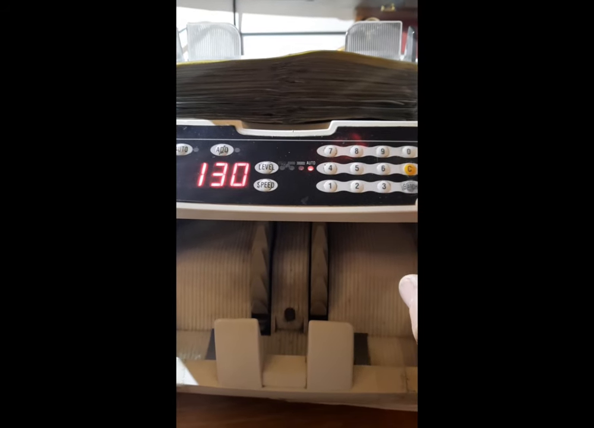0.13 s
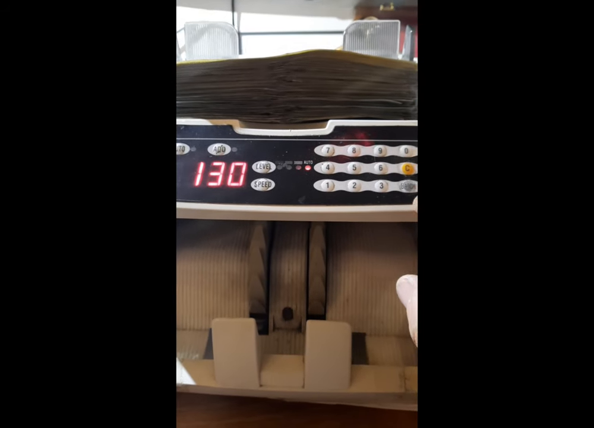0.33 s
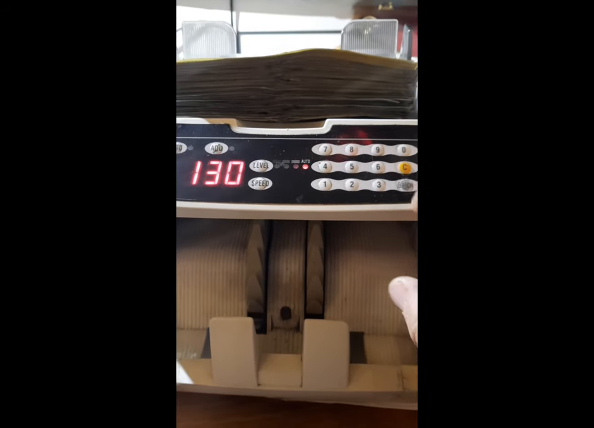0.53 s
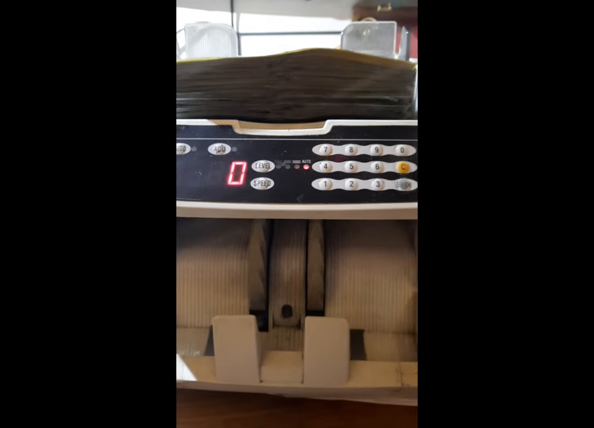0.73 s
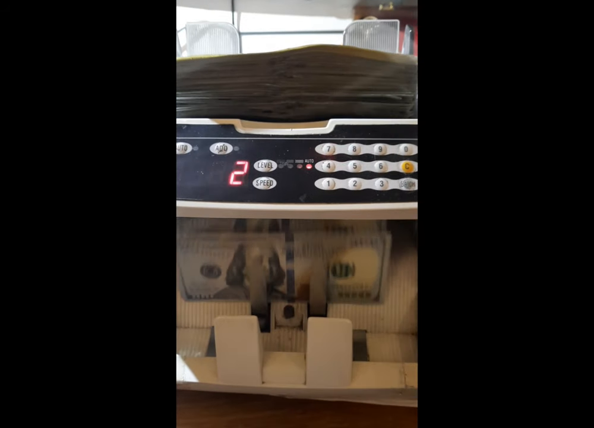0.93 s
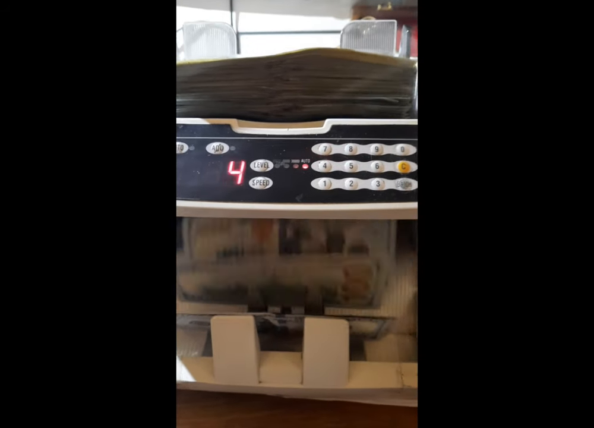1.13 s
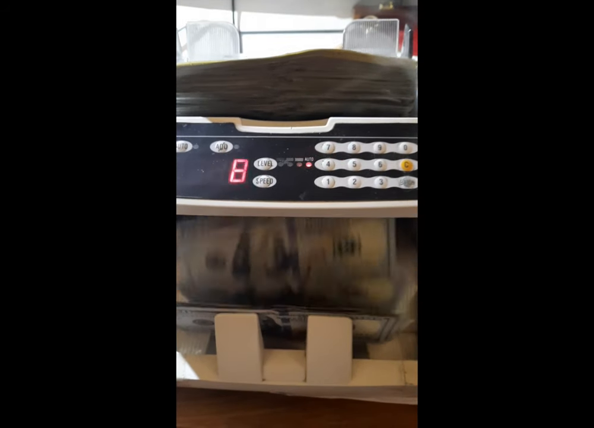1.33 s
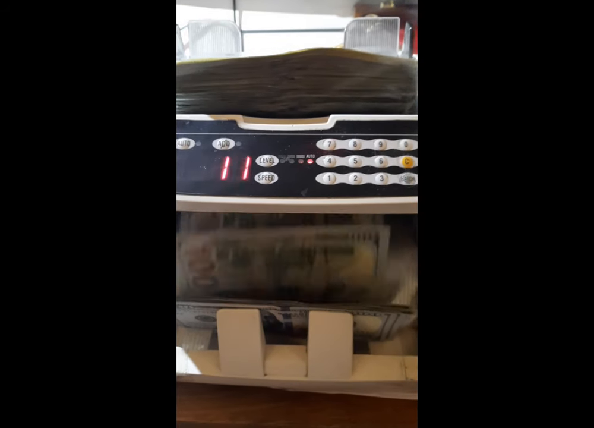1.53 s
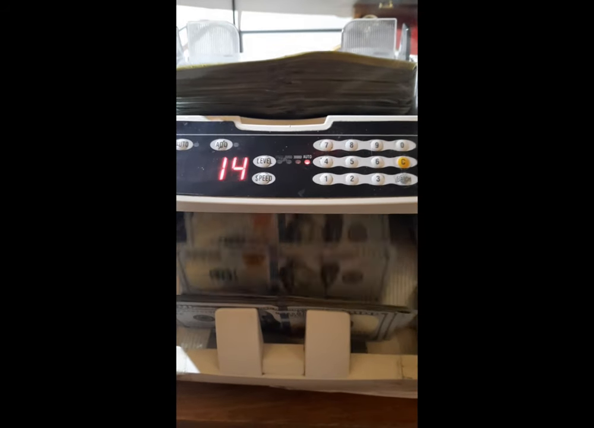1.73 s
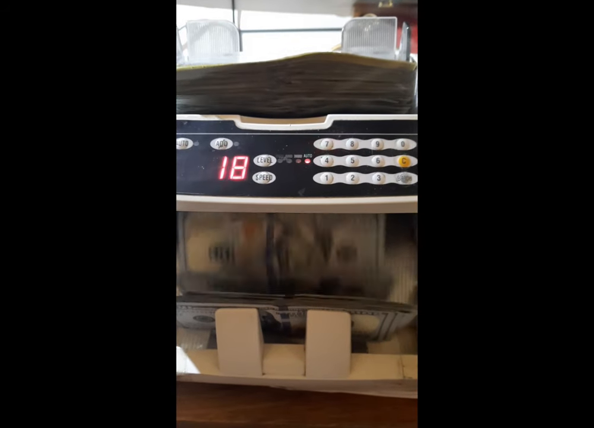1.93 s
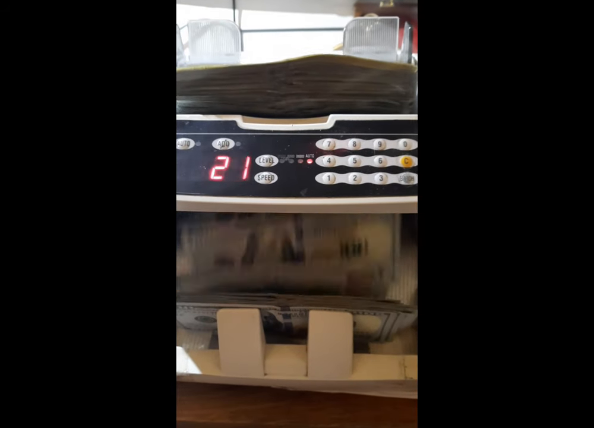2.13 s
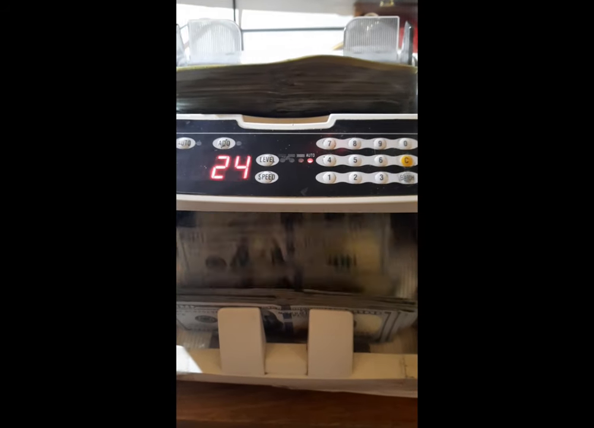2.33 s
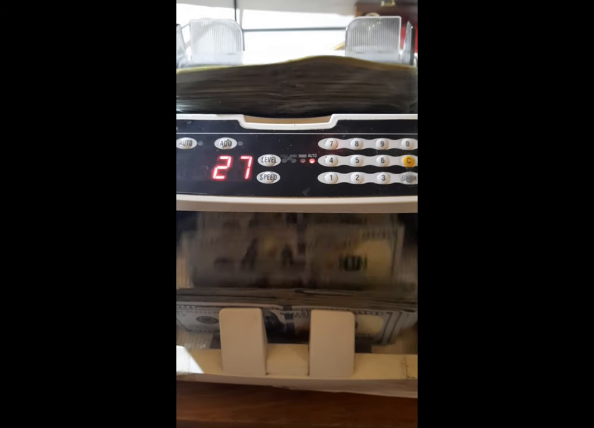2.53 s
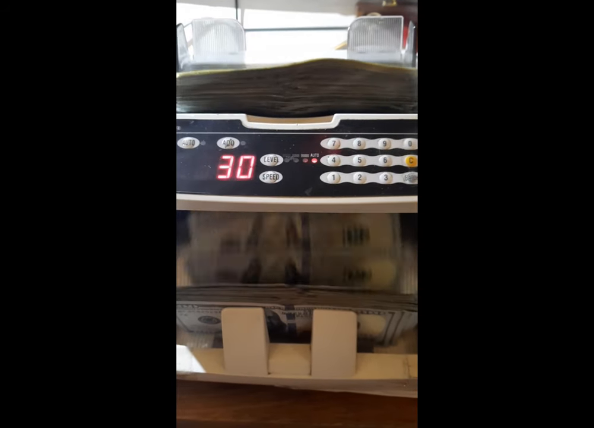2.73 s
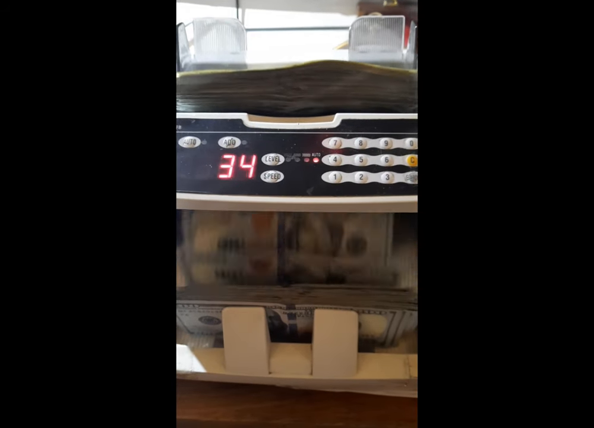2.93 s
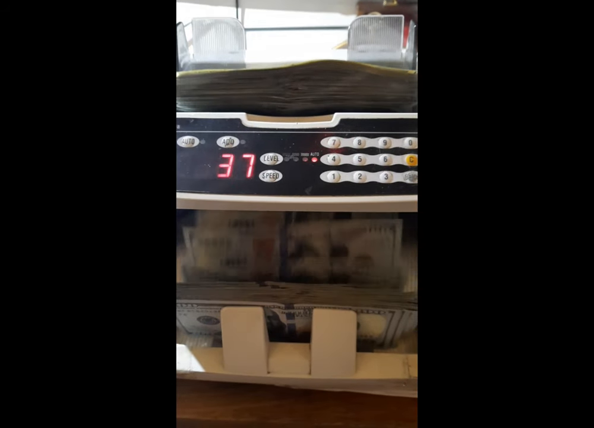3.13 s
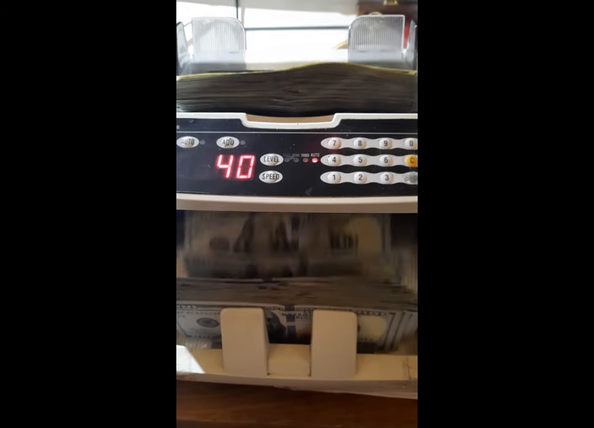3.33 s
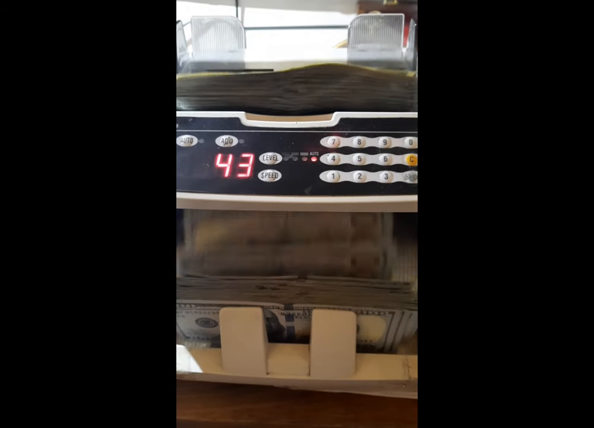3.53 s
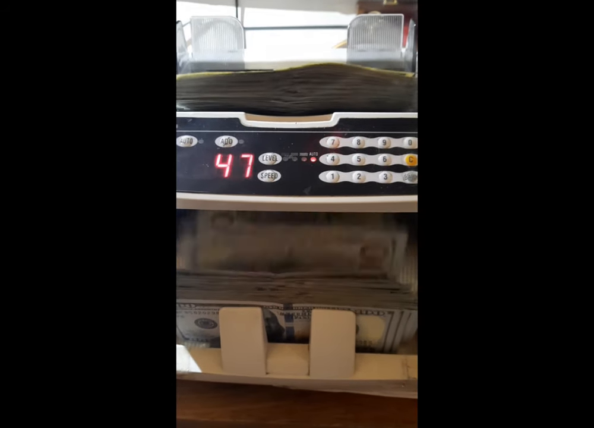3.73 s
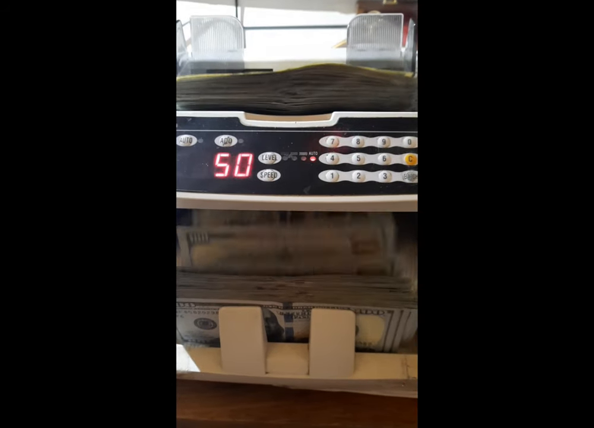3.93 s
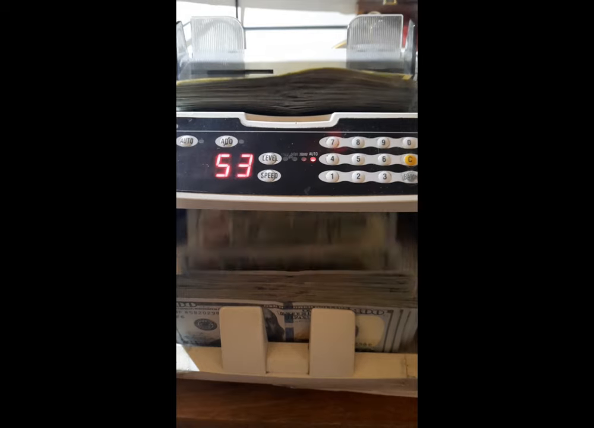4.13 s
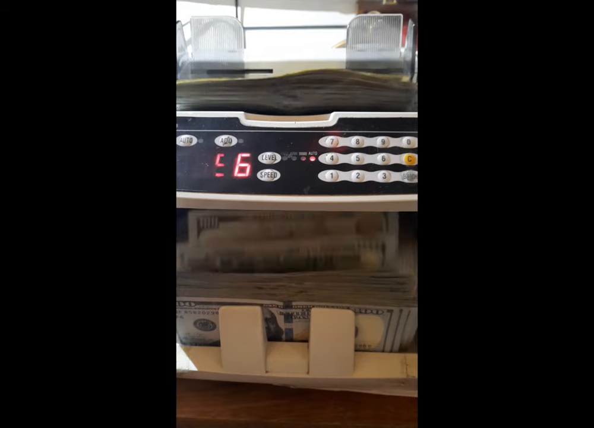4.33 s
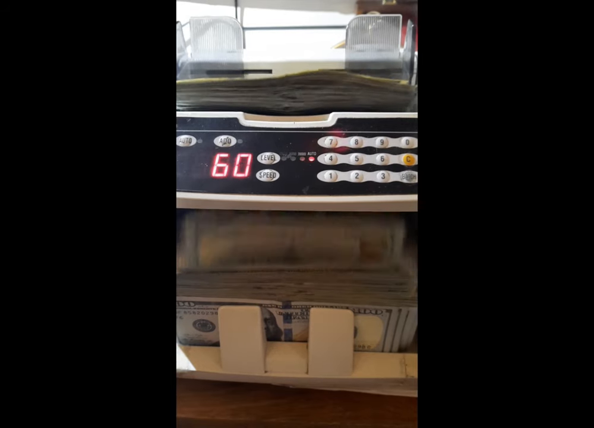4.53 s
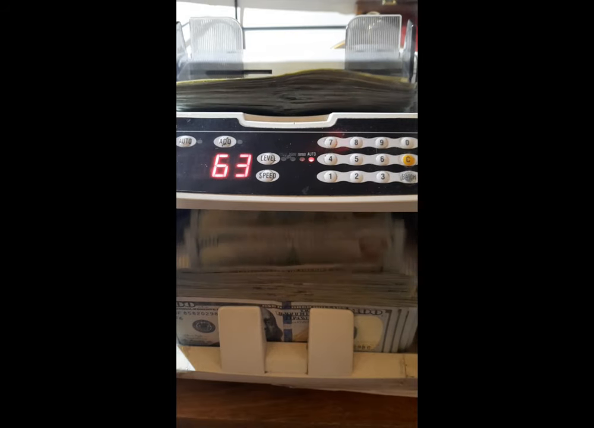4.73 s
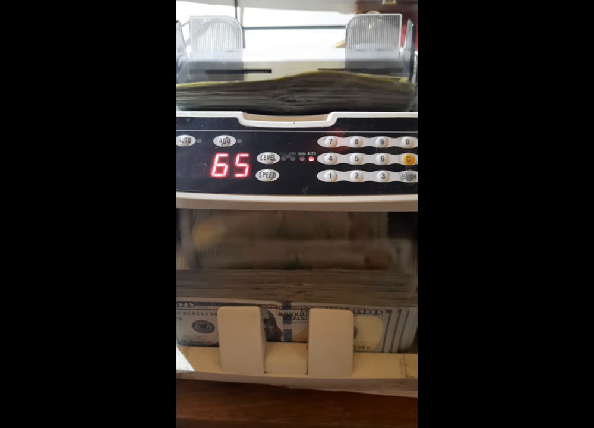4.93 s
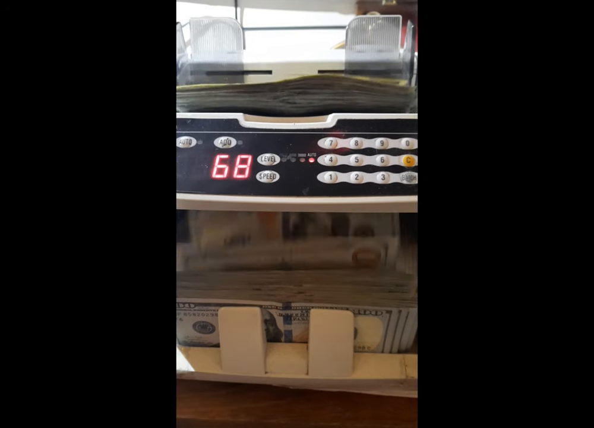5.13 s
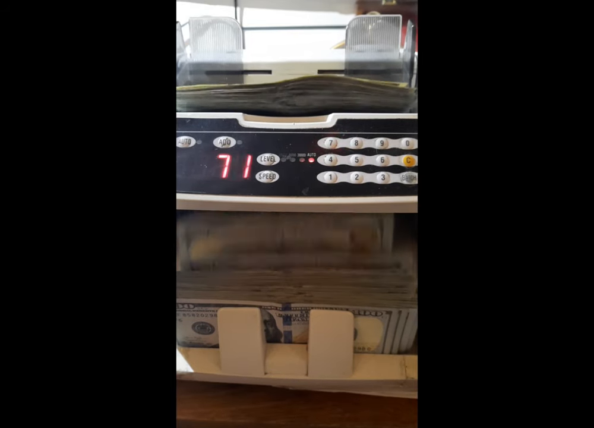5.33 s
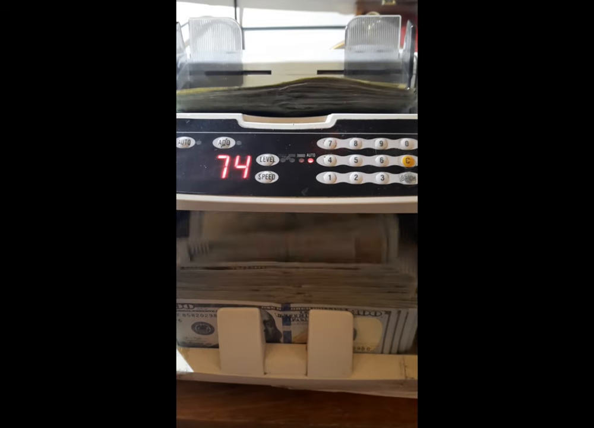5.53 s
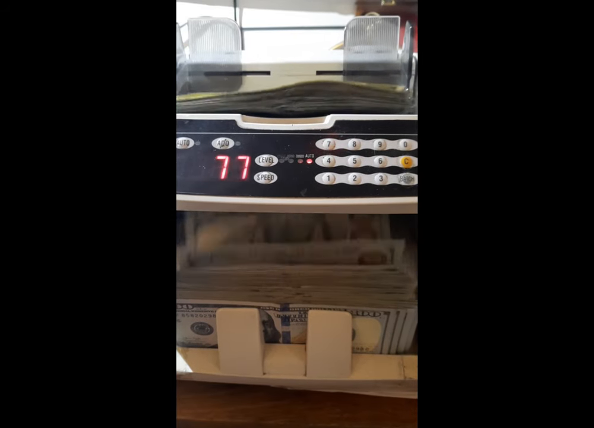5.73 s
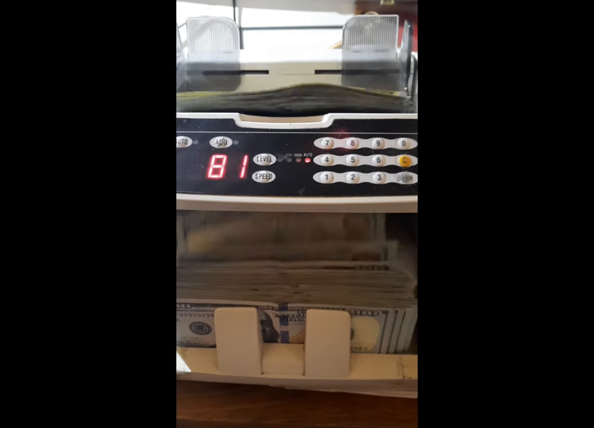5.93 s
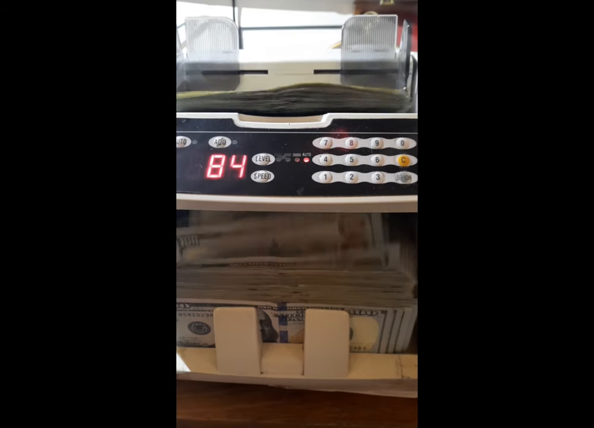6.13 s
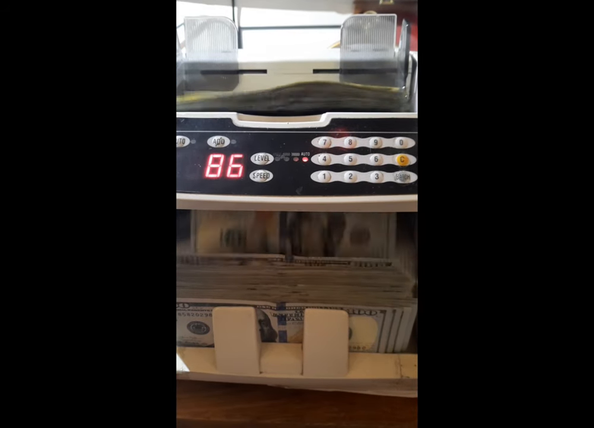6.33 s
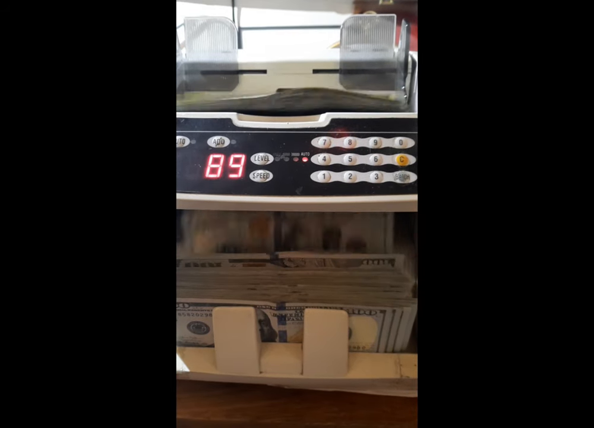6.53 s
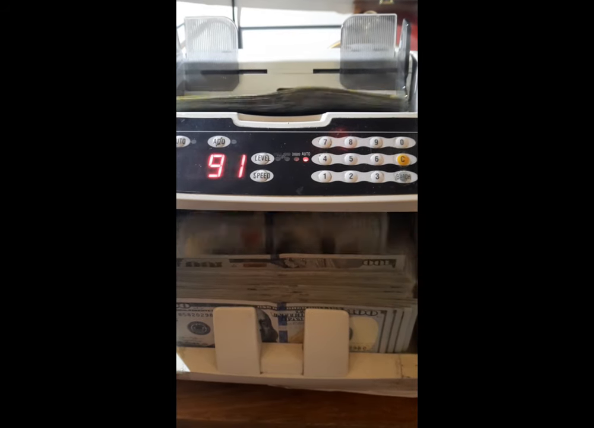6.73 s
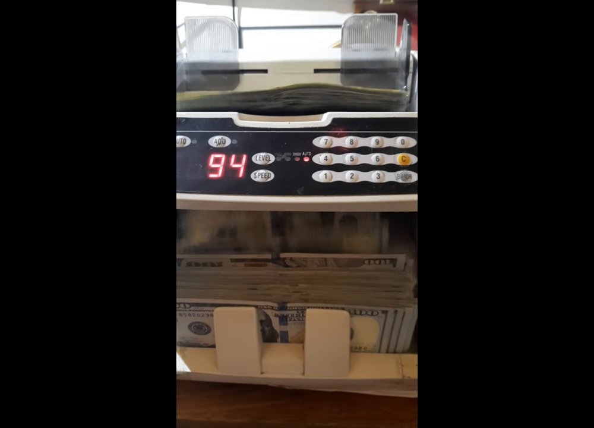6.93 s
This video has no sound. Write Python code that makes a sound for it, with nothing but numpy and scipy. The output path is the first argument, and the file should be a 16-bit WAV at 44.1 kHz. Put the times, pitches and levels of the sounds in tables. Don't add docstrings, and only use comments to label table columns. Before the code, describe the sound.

Close-up of a money counting machine: brief quiet, small clicks, a quick spin-up, then continuous fast papery flutter over a rattling, humming motor.

```python
import sys
import numpy as np
from scipy import signal
from scipy.fft import rfft, irfft, next_fast_len
from scipy.io import wavfile
from scipy.ndimage import uniform_filter1d

SR = 44100
rng = np.random.default_rng(int(sys.argv[2]) if len(sys.argv) > 2 else 0)


def wrap_up_sound(samples):
    columns = np.atleast_2d(samples).T
    tamed = np.clip(columns, -1, 1)
    steps = np.round(tamed * 32767).astype(np.int16)
    wavfile.write(sys.argv[1], SR, steps)


def gain_from_db(level_db):
    decades = np.asarray(level_db, float) / 20
    return 10 ** decades


N = 307818
FIRST_NOTE_S = .875

# frequency in Hz, density in dB per Hz.
PAPER_COLOUR = [(1300, -12), (2200, -1), (2750, -1), (3240, -7.5), (4700, -.6), (5410, -3.5), (6170, -2.5),
                (8170, -4.5), (8650, -5.5), (9550, -14), (11900, -3.5), (14000, -6), (16200, -7)]
# start in seconds, end in seconds.
DROPOUTS = [(2.9575, 3.0286), (4.0728, 4.1667)]
# centre in seconds, depth in dB, half length in seconds.
EMPTY_PATH = [(1.03, -4, 0.028), (5.02, -9, 0.034), (5.575, -10, 0.03), (6.487, -9, 0.028),
              (6.845, -7, 0.028), (6.965, -7, .015)]


def bins():
    return np.arange(next_fast_len(N) // 2 + 1) * SR / next_fast_len(N)


def on_log(table, hz):
    f, v = np.transpose(table)
    return np.interp(np.log(hz + 1), np.log(f + 1), v)


def shape(x, table):
    size = next_fast_len(N)
    y = irfft(rfft(x, size) * gain_from_db(on_log(table, bins())), size)[..., :N]
    return y / np.sqrt(np.mean(y ** 2))


def noise():
    # frequency in Hz, left-right likeness from 0 to 1.
    likeness = [(60, .92), (130, .96), (330, .95), (550, .85), (900, .65), (1250, .3), (1900, .55),
                (3000, .25), (9000, .2)]
    # frequency in Hz, left minus right in dB.
    tilt = [(60, 3), (110, 0.5), (200, -0.5), (380, 0), (700, 7.5), (1290, -3), (2380, -2.5), (4400, -4),
            (8120, -3), (15000, 1)]
    # frequency in Hz, lead of the left port in radians.
    lead = [(300, 0), (600, .6), (950, -1.3), (1380, 1.5), (1890, -.3), (3010, 3.1), (4480, 13.4),
            (16000, 27)]
    size = next_fast_len(N)
    like = on_log(likeness, bins())
    mid, side = rfft(rng.standard_normal((2, size)))
    opposite = np.array([[1], [-1]])
    pair = (np.sqrt(1 + like) * mid + np.sqrt(1 - like) * side * opposite) / np.sqrt(2)
    port = gain_from_db(on_log(tilt, bins()) / 2) * np.exp(.5j * on_log(lead, bins()))
    return irfft(pair * [port, 1 / port], size)[:, :N]


def ring(x, modes):
    y = 0
    for k, (hz, width, db) in enumerate(modes):
        b, a = signal.iirpeak(hz, hz / width, SR)
        y = y + (-1) ** k * gain_from_db(db) * signal.lfilter(b, a, x)
    return y / np.sqrt(sum(gain_from_db(2 * db) * width * np.pi / SR for hz, width, db in modes))


def even(x, modes, over_s):
    y = ring(ring(x, modes), modes)
    return y / np.sqrt(uniform_filter1d(np.mean(y ** 2, axis=0), int(over_s * SR)) + 1e-12)


def bursts(s, db, rise, fall):
    spikes = np.zeros(N)
    np.add.at(spikes, np.clip((np.asarray(s) * SR).astype(int), 0, N - 1), gain_from_db(db))
    after = signal.lfilter([1], [1, -np.exp(-1 / (abs(fall) * SR))], spikes)
    before = signal.lfilter([1], [1, -np.exp(-1 / (abs(rise) * SR))], spikes[::-1])[::-1]
    return after + before - spikes


def walk(rate):
    k = int(SR / rate)
    held = np.repeat(rng.standard_normal(N // k + 1), k)
    return 1.11 * uniform_filter1d(held, k)[:N]


def grain(rate, spread_db, smear_s):
    hits = (rng.random(N) < rate / SR) * gain_from_db(spread_db * rng.exponential(size=N))
    env = signal.lfilter([1], [1, -np.exp(-1 / (smear_s * SR))], hits)
    return env / np.sqrt(np.mean(env ** 2))


def bump(s, half_s):
    marks = np.zeros(N)
    marks[np.clip((s * SR).astype(int), 0, N - 1)] = 2 * half_s * SR
    return uniform_filter1d(uniform_filter1d(marks, int(2 * half_s * SR)), int(half_s * SR / 2))


def turns():
    # tick in seconds, turns made, seconds from the tick to the slap.
    roller_clock = [(.801, 0, .012), (.875, 1, .010), (.991, 3, .015), (1.114, 5, .016), (1.366, 9, .017),
                    (1.973, 19, .011), (2.29, 24, .018), (3.099, 36, .016), (3.883, 49, .017),
                    (4.413, 56, .017), (4.785, 62, .020), (5.212, 69, .022), (5.402, 72, .020),
                    (5.643, 76, .019), (5.891, 80, .019), (6.251, 86, .018), (6.501, 90, .017),
                    (6.921, 97, .015)]
    s, count, lag = np.transpose(roller_clock)
    machine_s = s - sum((s > start) * (end - start) for start, end in DROPOUTS)
    whole = np.arange(count[-1] + 1)
    tick = np.interp(whole, count, machine_s)
    moments = np.array([tick, tick + np.interp(whole, count, lag)])
    for start, end in DROPOUTS:
        moments = moments + (moments > start) * (end - start)
    return moments


def accent(s, db, rows):
    s, db, rows = np.array(s), np.array(db), np.array(rows)
    near = np.argmin(abs(s[:, None] - rows[:, 0]), axis=0)
    s[near], db[near] = rows[:, 0], rows[:, 1:]
    return s, db


def room():
    # frequency in Hz, density in dB per Hz.
    tone_colour = [(18, -30), (30, -15), (108, -4), (202, -18), (237, -5.5), (299, -1.5), (369, -18),
                   (479, -16), (546, -31), (921, -31), (8060, -40.5), (9430, -43), (15500, -31)]
    return shape(noise() * gain_from_db(1.5 * walk(2.2)), tone_colour) * gain_from_db(-65)


def touches():
    # time in seconds, level in dB, length in seconds, frequency in Hz.
    knocks_at_start = [(.445, -79, .04, 1700), (.445, -80, .03, 2700), (.578, -62, .03, 380),
                       (.577, -71, .02, 1100), (.575, -69, .002, 2600), (.575, -68, .002, 4800),
                       (.575, -68, .002, 8000), (.701, -50, .015, 370), (.445, -88, .03, 6000),
                       (.737, -58, .004, 7000), (.812, -38, .025, 350), (.965, -12, .003, 1500),
                       (1.012, -19, .008, 350)]
    x = noise()
    y = 0
    for s, db, long, hz in knocks_at_start:
        y = y + even(x, [(hz, hz * 0.35, 0)], 0.0033) * bursts([s], [db], long / 4, long)
    return y


def gears():
    # frequency in Hz, width in Hz, level in dB.
    housing = [(303.3, 51.6, -2.5), (339.5, 44.3, 2), (402.6, 82, -3), (573, 50, -10), (956, 145, -5.5),
               (1437, 158, -5), (1807, 92, -5), (2500, 1100, -17), (172, 64, -21)]
    grip = bump(turns()[1, 1:] + .015, .0075)
    empty = np.arange(N) < FIRST_NOTE_S * SR
    teeth = noise()
    low = ring(teeth * gain_from_db(walk(30)), housing[:3] + housing[-1:])
    rattle = grain(1200, 1.2, .002) * gain_from_db(walk(40) - 5 * grip - 5 * empty)
    high = ring(teeth * rattle, housing[3:-1])
    return gain_from_db(-0.5) * low + gain_from_db(-1.0) * high


def motor():
    # frequency in Hz, width in Hz, level in dB.
    whine_modes = [(1254, 52, -4), (1884, 67, 1), (2420, 350, -20)]
    t = np.arange(N) / SR
    hum = even(noise(), [(133, 24, 4), (89.5, 180, -9)], .1) * gain_from_db(walk(14))
    x = noise()
    whine = even(x, whine_modes[::2], .02)
    whine = whine + even(x, whine_modes[1:2], 0.023) * (t > .772)
    return gain_from_db(-15.0) * hum + gain_from_db(-9.5) * whine * (t < FIRST_NOTE_S)


def rustle(rustle_db):
    t = np.arange(N) / SR
    thin_db = sum(db * np.exp(-((t - s) / half) ** 4) for s, db, half in EMPTY_PATH)
    hiss = noise() * gain_from_db(2.3 * walk(40))
    crinkle = noise() * grain(400, 1.9, 0.0024)
    return gain_from_db(rustle_db + thin_db) * shape(hiss + gain_from_db(-9.0) * crinkle, PAPER_COLOUR)


def roller():
    # time in seconds, level in dB.
    catches = [(.801, -27), (.875, -26), (.991, -21), (1.178, -24), (1.365, -19), (1.734, -21),
               (1.973, -22), (2.034, -33), (2.162, -22), (2.29, -19), (2.538, -19.5), (2.658, -25),
               (2.72, -20), (2.906, -21), (3.099, -25), (3.701, -25), (3.762, -25), (4.069, -24),
               (4.285, -24), (4.722, -22), (4.844, -22), (4.906, -24), (4.968, -26), (5.028, -24.5),
               (5.828, -27), (6.191, -26), (6.251, -21), (6.438, -24), (6.741, -29), (6.8, -24)]
    s = turns()[0]
    faint_db = -29 - 7 * abs(rng.standard_normal((len(s), 1)))
    s, db = accent(s, faint_db, catches)
    t = np.arange(N) / SR
    chirp = np.sin(2 * np.pi * 4550 * t + 3 * walk(48))
    tick = uniform_filter1d(bursts(s, db[:, 0] + 8.0, 0.0003, 0.0011), 40) * chirp
    cam_db = -30.0 + 1.1 * rng.standard_normal(len(s) - 2)
    cam = even(noise(), [(1440, 210, 2), (1656, 40, 5.5)], 0.0017)
    cam = cam * bursts(s[2:] - .003, cam_db, 0.0027, 0.0078)
    return tick * gain_from_db(np.array([[-7.0], [2.5]])) + cam


def stack():
    # ordinary level in dB, scatter in dB.
    ordinary = [(-25.5, 2.5), (-25, 2.2), (-23.7, 1.2), (-30.5, 3), (-29.5, 2.5)]
    slip_db = [-7, -6, -4, -14, -20]
    # time in seconds, low ring, high ring
    # and crack in dB.
    marked_slaps = [(.887, -19, -23, -21), (.936, -21, -25, -24), (1.131, -24, -22, -20), (1.193, -24, -22, -24),
                    (1.259, -23, -24, -21), (1.38, -20, -26, -23), (1.684, -24, -22, -20), (1.744, -28, -20, -22),
                    (2.113, -25, -23, -20), (2.179, -21, -24, -22), (2.243, -29, -21, -22), (2.309, -21, -22, -25),
                    (2.675, -24, -21, -23), (2.797, -21, -23, -24), (2.861, -25, -22, -20), (3.052, -16, -30, -22),
                    (3.115, -30, -20, -22), (3.596, -21, -29, -18), (3.656, -21, -23, -21), (3.717, -21, -23, -22),
                    (3.779, -32, -19, -18), (3.84, -20, -24, -23), (3.964, -22, -20, -25), (4.026, -22, -21, -20),
                    (4.746, -20, -29, -24), (4.805, -19, -26, -22), (5.05, -20, -22, -26), (5.784, -26, -21, -21),
                    (6.755, -25, -22, -22), (6.876, -24, -18, -24),
                    (1.447, -25, -23, -26), (3.294, -25, -24, -24), (3.905, -20, -28, -26),
               (4.246, -24, -24, -26), (4.56, -26, -21, -28), (4.612, -22, -23, -25),
               (5.241, -22, -27, -26), (5.599, -23, -26, -23), (5.667, -26, -29, -25),
               (5.724, -27, -26, -21), (6.274, -23, -24, -23)]
    # time of the slap in seconds, level in dB.
    hard_knocks = [(.887, -23), (.936, -17), (1.193, -14), (1.865, -23), (1.925, -22), (2.243, -20),
                   (2.309, -21), (2.493, -23), (2.797, -21), (2.923, -22), (4.026, -23), (4.426, -22),
                   (4.612, -20), (4.675, -20), (5.297, -23), (6.391, -20), (6.638, -22)]
    # time of the slap in seconds, level in dB.
    sharp_flicks = [(1.684, -22), (1.744, -24), (1.865, -24), (3.474, -22), (3.656, -19), (4.49, -24),
                    (4.746, -22), (6.208, -21), (6.274, -24), (6.876, -24)]
    s = turns()[1, 1:]
    chance = rng.standard_normal((len(s), 6))
    level, scatter = np.transpose(ordinary)
    gap_distance = abs(s[:, None] + .03 - np.transpose(EMPTY_PATH)[0])
    slipped = np.min(gap_distance, axis=1) < .02
    db = level + scatter * chance[:, 1:] + np.outer(slipped, slip_db)
    slap_s, slap_db = accent(s + .0015 * chance[:, 0], db[:, :3], marked_slaps)
    knock_db = accent(s, db[:, 3:4], hard_knocks)[1][:, 0]
    flick_db = accent(s, db[:, 4:], sharp_flicks)[1][:, 0]
    return slap_s, *slap_db.T, knock_db, flick_db


def slap(s, low_db, high_db, crack_db):
    # frequency in Hz, width in Hz, level in dB.
    tray = [(965, 290, -3), (1930, 160, 0), (300, 320, 0)]
    x = noise()
    thud = even(x, tray[:1], 0.0016) * bursts(s + 0.00076, low_db + 3.5, 0.0025, 0.0035)
    thud += even(x, tray[1:2], 0.0012) * bursts(s + 0.00057, high_db + 2.5, 0.0025, 0.0035)
    thud += even(x, tray[2:], 0.014) * bursts(s + 0.0014, low_db - 8.0, 0.0083, 0.009)
    drag = even(x, [(1750, 200, 0)], .005) * bursts(s - .008, high_db - 4, .005, .004)
    crack = shape(noise(), PAPER_COLOUR) * bursts(s - .001, crack_db + 5.5, .0028, .005)
    return thud + drag + crack


def edge(s, crack_db, flick_db):
    x = noise()
    swish = even(x, [(12600, 8700, 0)], .002) * bursts(s + .023, crack_db - 7.5, 0.0043, 0.006)
    flick = even(x, [(6300, 1800, 0), (8200, 1500, 0), (12000, 2500, -3)], .002)
    return swish + flick * bursts(s + .033, flick_db + 4, .0007, .0025)


def knock(s, knock_db):
    # frequency in Hz, width in Hz, level in dB.
    panel = [(838, 185, -0.31), (1550, 510, -0.69)]
    return even(noise(), panel, 0.0017) * bursts(s + .028, knock_db, 0.005, 0.005)


def notes():
    s, low_db, high_db, crack_db, knock_db, flick_db = stack()
    return slap(s, low_db, high_db, crack_db) + edge(s, crack_db, flick_db) + knock(s, knock_db)


def scene():
    # time in seconds, drive rumble in dB, paper rustle in dB.
    spin_up = [(.70, -83, -90), (.74, -43.5, -63), (.78, -35.5, -58), (.805, -32.5, -42),
               (.87, -22.5, -32.5), (.88, -19.5, -20.5), (.955, -18.5, -23.5), (1.02, -24.5, -29),
               (1.08, -22.5, -27.5)]
    steady_run = [(1.65, -23.5, -24.5), (2.2, -22.5, -25), (3.035, -25, -25.5), (3.55, -23, -24),
                  (4.25, -25.5, -28.5), (4.71, -24, -26), (5.5, -25, -26), (6.15, -23.5, -23.5),
                  (6.93, -25.5, -26.5)]
    s, *columns = np.transpose(np.vstack([spin_up, steady_run]))
    rumble_db, rustle_db = (np.interp(np.arange(N) / SR, s, c, left=-120) for c in columns)
    drive = gain_from_db(rumble_db) * (gears() + motor())
    return room() + touches() + drive + rustle(rustle_db) + roller() + notes()


def band_limit(x):
    return signal.sosfilt(signal.butter(12, 16400, fs=SR, output="sos"), x)


def record(dry):
    x = signal.sosfilt(signal.butter(2, 55., "high", fs=SR, output="sos"), dry)
    x = signal.sosfilt(signal.ellip(10, .3, 70, 15850, fs=SR, output="sos"), x)
    t = np.arange(N) / SR
    fade_s = .0018
    for start, end in DROPOUTS:
        x = x * np.where(t < end, np.exp(-np.clip(t - start, 0, 1) / fade_s), 1)
    return band_limit(x)


dry = scene()
out = record(dry)
wrap_up_sound(out)
```